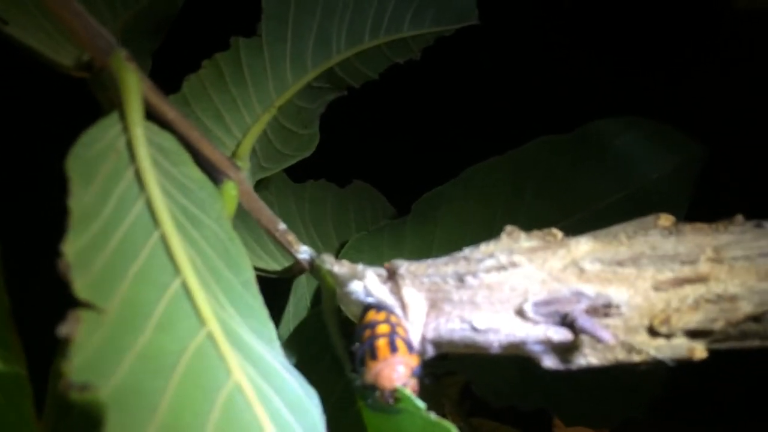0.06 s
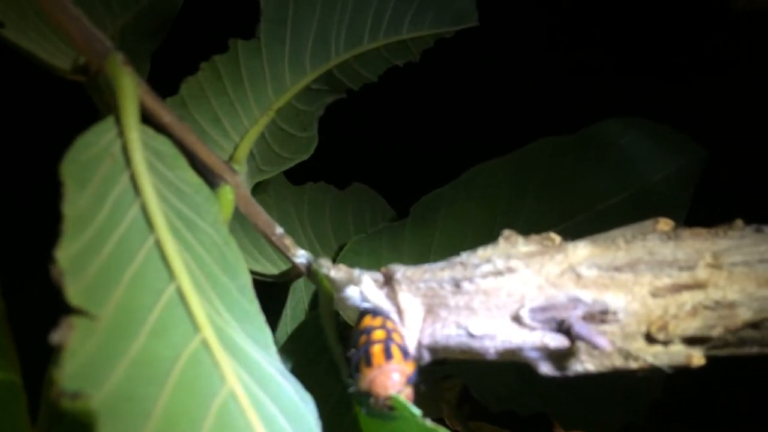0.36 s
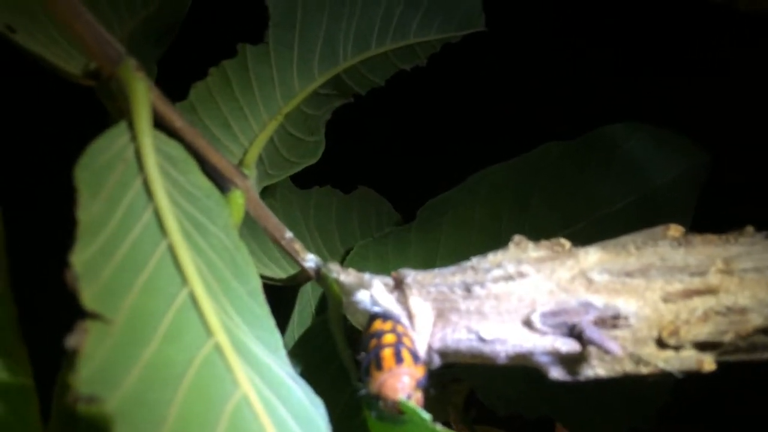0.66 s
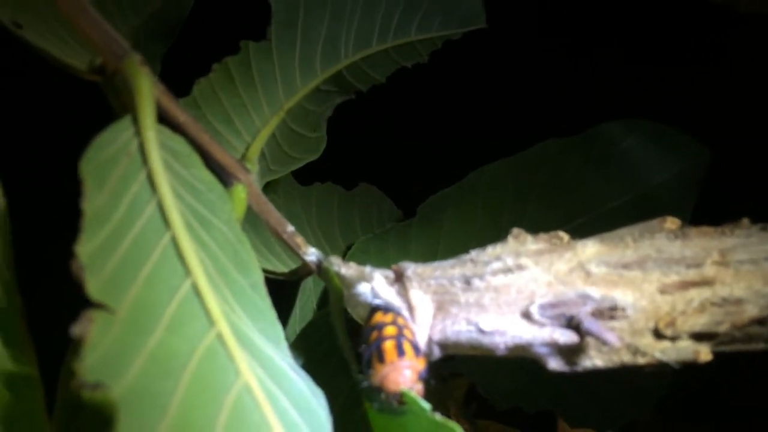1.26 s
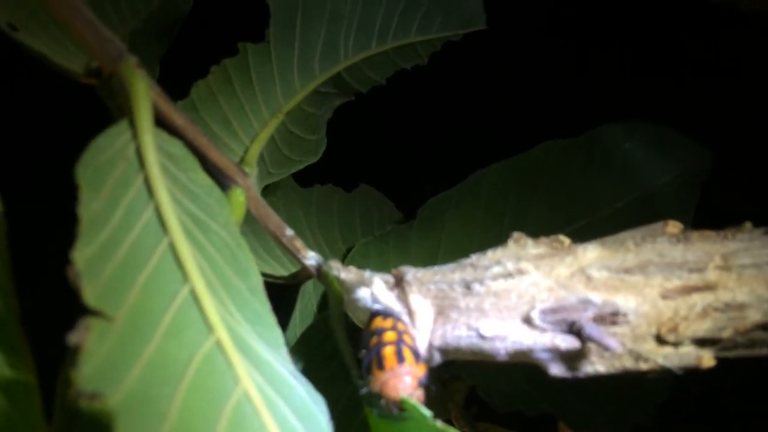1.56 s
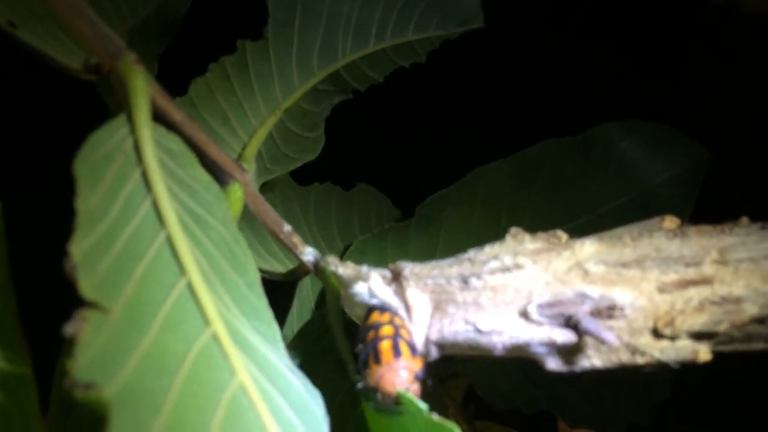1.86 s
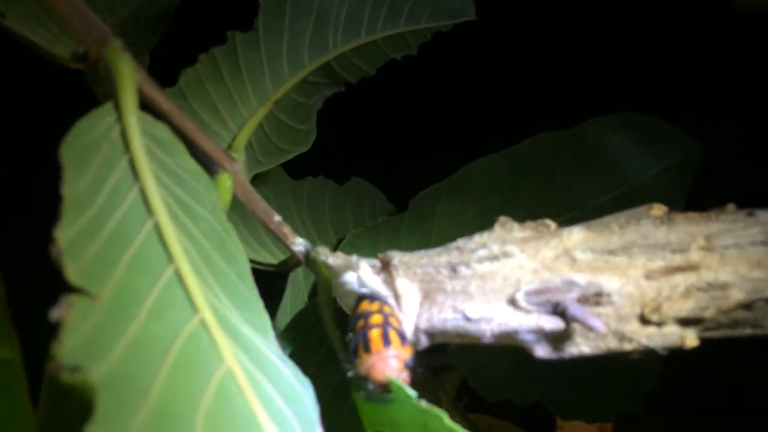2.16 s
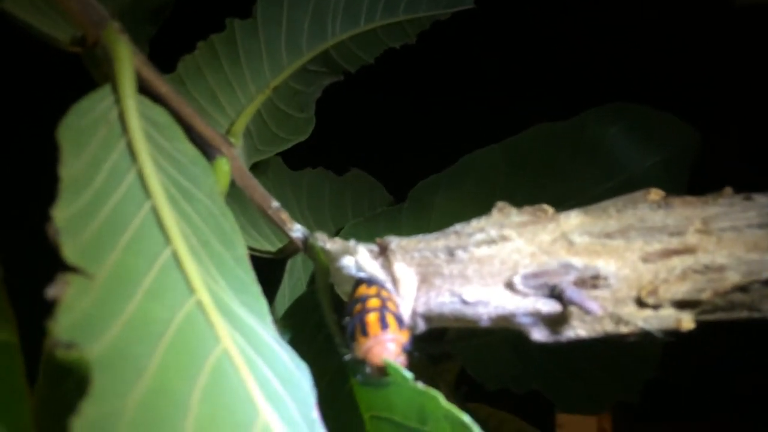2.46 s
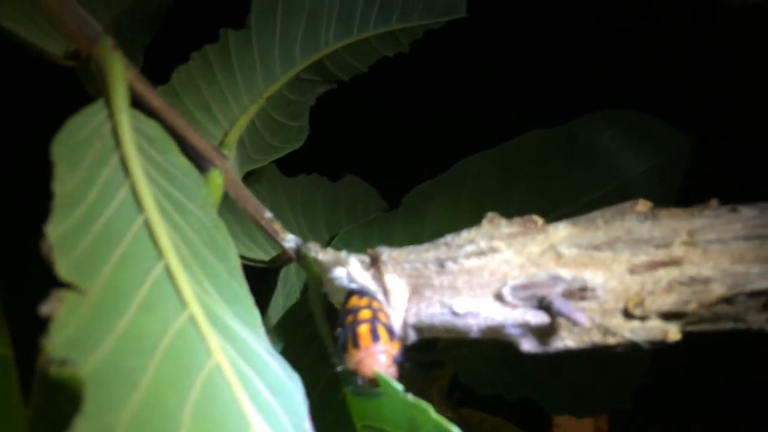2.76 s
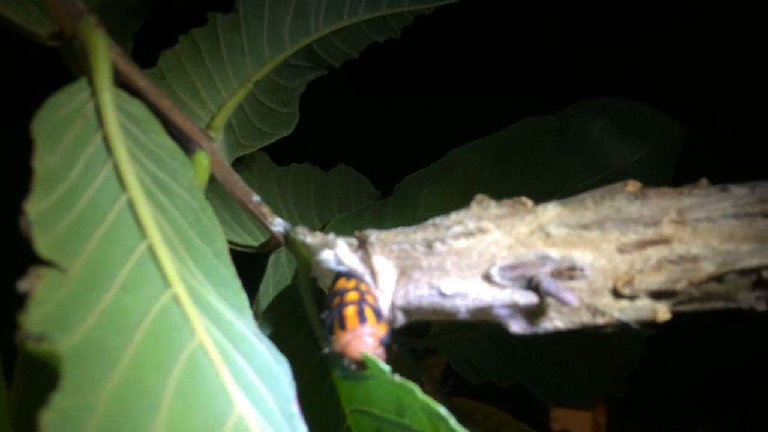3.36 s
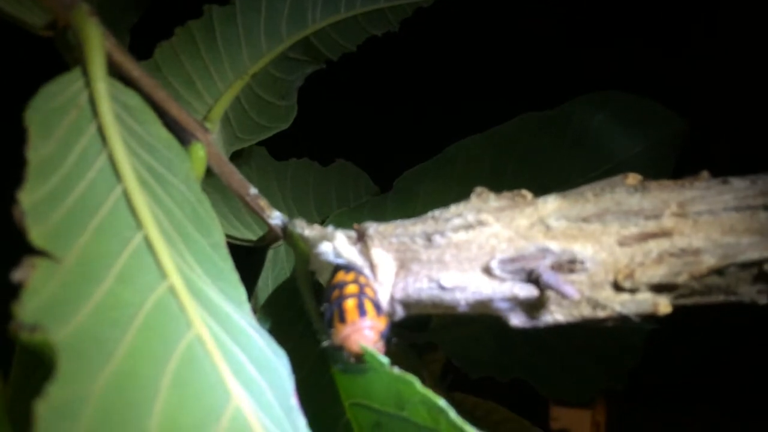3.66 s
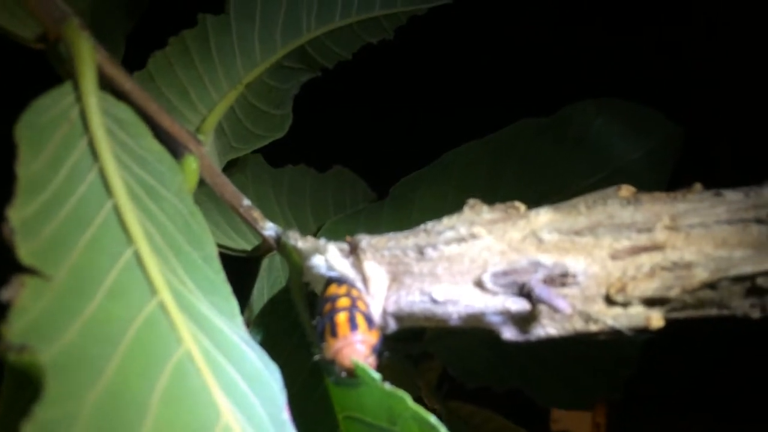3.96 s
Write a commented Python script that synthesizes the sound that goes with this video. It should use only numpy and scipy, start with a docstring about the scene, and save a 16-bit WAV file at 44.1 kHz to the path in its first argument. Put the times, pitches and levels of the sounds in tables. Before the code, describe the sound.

Tiny crisp snaps of an insect larva biting a leaf, with a far engine humming.

```python
"""At the edge of a leaf at night, a larva chews close by.
Each bite snaps a few fibres; each snap is an impulse that excites the leaf's damped modes,
which ring for some milliseconds. Tiny crackles surround the bites.
Behind it a far engine drones over a low rumble, a second hum beats against the drone,
and the night air hisses softly."""
import sys
import numpy as np
from scipy import signal
from scipy.fft import rfft, irfft, next_fast_len
from scipy.io import wavfile
from scipy.ndimage import map_coordinates

SR = 44100
rng = np.random.default_rng(int(sys.argv[2]) if len(sys.argv) > 2 else 0)


def to_wav(s):
    """Save 16-bit WAV."""
    ch = np.atleast_2d(s).T  # columns
    pcm = np.round(np.clip(ch, -1, 1) * 32767)  # PCM
    wavfile.write(sys.argv[1], SR, pcm.astype(np.int16))


N = 176400


def amp(db):
    """Amplitude ratio of a level in decibels."""
    return 10 ** (np.asarray(db) / 20)


def unit_rms(x):
    """Normalisation to rms 1."""
    return x / np.sqrt(np.mean(x ** 2) + 1e-20)


def curves(rows):
    """Linear interpolation: one value per sample for each column after the time."""
    times, *columns = np.transpose(rows)
    return [np.interp(np.arange(N) / SR, times, column) for column in columns]


def wobble(knots_per_s):
    """Slow random modulation: a spline through Gaussian values."""
    return map_coordinates(rng.standard_normal(400), [np.arange(N) * knots_per_s / SR], mode="wrap")


def filtered(x, response):
    """Linear filtering: the spectrum of x times a frequency response."""
    size = next_fast_len(N + 8192)
    return irfft(rfft(x, size) * response(np.fft.rfftfreq(size, 1 / SR)), size)[:N]


def noise(spectrum):
    """Spectral shaping: noise of rms 1 coloured by (f/Hz, level/dB) points."""
    hz, db = np.transpose(spectrum)
    white = rng.standard_normal(N)
    return unit_rms(filtered(white, lambda f: amp(np.interp(np.log(f + 1), np.log(hz), db))))


def add(track, start_s, sound):
    """Superposition of a short sound on the track."""
    part = track[max(round(start_s * SR), 0):][:len(sound)]
    part += sound[:len(part)]


# spectrum of the hiss: f/Hz, relative level/dB
HISS_SPECTRUM = [(60, -8), (250, 4.5), (350, 3), (500, -2), (900, 1), (1150, -3), (1400, -6), (1800, -7.5),
                 (2100, -11), (3000, -13.5), (4500, -17), (7000, -19), (9000, -21.5), (15000, -24)]
# spectrum of the low wash: f/Hz, relative level/dB
WASH_SPECTRUM = [(120, -11.5), (220, -0.5), (320, -0.5), (450, 0), (650, -6.5), (1200, -37)]
# envelope of the wash: t/s, level/dB
WASH_ENVELOPE = [(0, -78.5), (.7, -78.5), (1.4, -79.5), (1.85, -70.5), (2.2, -78.5), (2.7, -79.5),
                 (3.2, -74.5), (4, -76)]
# bands of a faint far whir: centre f/Hz, half width/Hz, level/dB
WHIR_BANDS = [(1543, 35, -81.5), (1621, 47, -81)]


def night_air(hiss_db=-69.5):
    """Incoherent noises add in power: even hiss, a slowly swelling wash and a narrow-band whir."""
    wash_db, = curves(WASH_ENVELOPE)
    out = amp(hiss_db) * noise(HISS_SPECTRUM) + amp(wash_db) * noise(WASH_SPECTRUM)
    for centre, width, db in WHIR_BANDS:
        band = filtered(rng.standard_normal(N), lambda f: 1 / (1 + ((f - centre) / width / 2) ** 2) ** 2)
        out += amp(db) * unit_rms(band)
    return out


# course of the second hum: t/s, f/Hz, fundamental level/dB, octave level/dB
HUM_COURSE = [(0, 68.3, -66, -64.5), (1, 67, -53, -65.5), (1.65, 66.38, -62.5, -71.5),
              (1.9, 66, -55, -65.5), (2.6, 69, -62, -66), (2.9, 67.81, -54, -59), (3.4, 67.29, -49.5, -61),
              (3.7, 68, -55.5, -63.5), (4, 71.8, -58, -63)]


def wavering_hum(wander_hz=0.71):
    """Beating: a tone drifts just below the engine's drone, so their sum pulses at the difference."""
    hz, fundamental_db, octave_db = curves(HUM_COURSE)
    phase = 2 * np.pi * np.cumsum(hz + wander_hz * wobble(7)) / SR
    return np.sqrt(2) * (amp(fundamental_db) * np.sin(phase) + amp(octave_db) * np.sin(2 * phase))


# envelope of the engine's fundamental: t/s, level/dB
DRONE_ENVELOPE = [(0, -43.5), (.08, -52.5), (.18, -44.5), (.3, -55), (.54, -42.5), (.63, -59.5), (.7, -44),
                  (.8, -40.5), (.92, -54), (1.08, -57.5), (1.22, -45), (1.42, -50), (1.52, -45.5),
                  (1.68, -48), (1.8, -59), (2.15, -49), (2.55, -60.5), (2.8, -55), (2.97, -47.5),
                  (3.12, -58.5), (3.22, -43.5), (3.31, -54), (3.44, -44.5), (3.54, -59), (3.72, -49),
                  (3.82, -42.5), (3.92, -52), (4, -57.5)]
# envelopes of its harmonics: t/s, third's level/dB, fourth's level/dB
HARMONIC_ENVELOPES = [(0, -85, -90), (1.2, -78.5, -86.5), (2.3, -72.5, -83), (2.75, -68.5, -72.5),
                      (3.15, -75, -85), (4, -69, -79)]
# spectrum of its rumble: f/Hz, relative level/dB
RUMBLE_SPECTRUM = [(10, -21.5), (28, -1), (50, -5.5), (72, 5.5), (90, 0.5), (125, 5), (160, -7),
                   (205, -11.5), (270, -25), (500, -48), (1500, -102)]


def far_engine(drone_hz=75.34, wander_hz=.5, flutter_db=0.38, harmonic_flutter_db=2.2):
    """A periodic source gives a harmonic series; a noisy rumble swells with its fundamental."""
    level_db, = curves(DRONE_ENVELOPE)
    phase = 2 * np.pi * np.cumsum(drone_hz + wander_hz * wobble(5)) / SR
    drone = amp(level_db - flutter_db * wobble(10)) * np.sin(phase)
    for harmonic, db in enumerate(curves(HARMONIC_ENVELOPES), 3):
        drone += amp(db + harmonic_flutter_db * wobble(4)) * np.sin(harmonic * phase)
    rumble_db = -55.5 + 0.39 * (level_db - level_db.mean())
    return np.sqrt(2) * drone + amp(rumble_db) * noise(RUMBLE_SPECTRUM)


# modes of the leaf before a snap's colouring: f/Hz, relative level/dB, T60/s
LEAF_MODES = [(650, -24, .005), (1350, -19, .005), (2120, -15, .005), (2600, -11, .007), (2950, -11, .006),
              (3570, -8, .005), (4150, -17, .004), (5200, -14, .005), (7000, -10.5, .005),
              (8500, -19, .004), (9800, -17, .004), (11300, -23, .003), (13600, -21, .004)]


def fibre_snap(tilt, favoured_hz, attack_s=.00008, crack_t60_s=.003, crack_top_hz=11500):
    """Impulse response: a fibre cracks and the leaf's modes ring, tilted by tilt dB per octave."""
    t = np.arange(SR // 40) / SR
    hz, db, t60 = np.transpose(LEAF_MODES)[:, :, None]
    tilt_db = tilt * np.log2(hz / 3240)
    lift_db = 8.5 * np.exp(-(np.log2(hz / favoured_hz) / 0.77) ** 2)  # a bell curve in octaves
    scatter_db = 1.5 * rng.standard_normal(hz.shape)
    gain = amp(db + tilt_db + lift_db + scatter_db)
    ring_t60 = t60 * 2 ** (-min(tilt, 0) / 10.7)  # dull snaps ring longer
    polarity = (-1) ** np.arange(len(hz))[:, None]
    modes = polarity * gain * np.exp(-np.log(1000) * t / ring_t60) * np.sin(2 * np.pi * hz * t)
    crack_gain = amp(-7.5 + tilt)  # bright snaps crack louder
    crack = crack_gain * np.exp(-np.log(1000) * t / crack_t60_s) * rng.standard_normal(len(t))
    crack = signal.lfilter(*signal.butter(2, crack_top_hz, fs=SR), crack)
    return (modes.sum(0) + crack) * (1 - np.exp(-t / attack_s))


# spells of chewing: start t/s, end t/s
CHEWING_SPELLS = [(0.172, 0.39), (0.999, 1.25), (2.15, 2.35), (3.501, 3.98)]


def crackle(snaps_per_s=130, gain_db=-71.5):
    """Shot noise: tiny fibres give way at random instants during each spell of chewing."""
    out = np.zeros(N)
    for start, end in CHEWING_SPELLS:
        for _ in range(int((end - start) * snaps_per_s)):
            add(out, rng.uniform(start, end), amp(gain_db) * fibre_snap(rng.normal(), favoured_hz=5550))
    return out


# snaps of the bites: t/s, relative level/dB, tilt/(dB per octave), f/Hz that the fibre favours
BITE_SNAPS = [(0.1896, -52.5, 3, 4500), (0.2496, -48.5, 2.5, 6600), (0.251, -54, -9, 2360),
              (0.274, -59, -3, 2600), (0.2768, -57.5, 0, 2900), (.4215, -65, 3.5, 7000),
              (.8167, -34, -1.5, 3500), (.8178, -39.5, -7, 2700), (1.0407, -61, -1, 3000),
              (1.067, -66, -1, 7000), (1.1142, -63, -12, 7000), (1.141, -58, 1, 2680),
              (1.2356, -57, 2, 5160), (2.218, -61.5, -5, 7000), (2.2253, -62, 5, 3000),
              (2.3302, -63, 0, 7000), (2.6771, -68, -8, 2586), (3.5205, -54, -3, 7000),
              (3.5466, -61, -7, 7000), (3.5723, -63, 6, 5200), (3.5891, -60, -4, 7000),
              (3.595, -54, 0, 5200), (3.6342, -56, -3, 5200), (3.7523, -50, -3, 3000),
              (3.7559, -38, -1, 5400), (3.7857, -60, 2, 6900), (3.7902, -59, -2, 3000),
              (3.8064, -64, 8, 7200), (3.827, -62, -4, 3000), (3.8306, -60, -2, 2800),
              (3.8388, -49.5, 6, 7600), (3.9531, -59, -6, 7010)]


def bites():
    """Impulsive excitation by fracture: the jaws cut the leaf in distinct snaps."""
    out = np.zeros(N)
    for start, db, tilt, favoured_hz in BITE_SNAPS:
        add(out, start, amp(db) * fibre_snap(tilt, favoured_hz))
    return out


def scene():
    """Superposition of the night's background and the chewing, in one channel."""
    return (far_engine() + wavering_hum() + night_air() + bites() + crackle())[None]


def record(dry):
    """Band limiting: an ideal low-pass filter removes everything above 15.3 kHz."""
    return filtered(dry[0], lambda f: f < 15300)[None]


dry = scene()
out = record(dry)
to_wav(out)
```